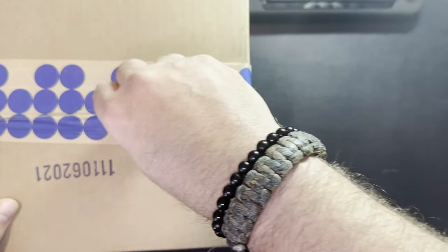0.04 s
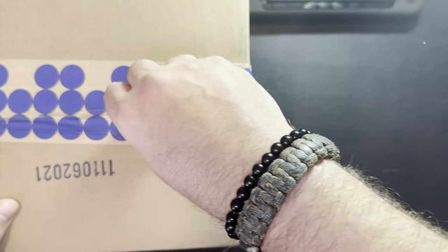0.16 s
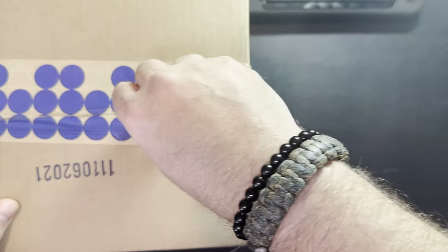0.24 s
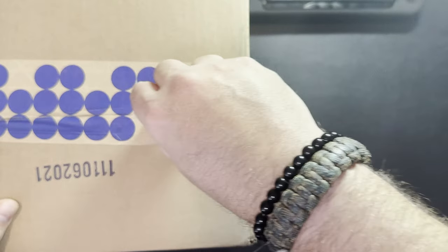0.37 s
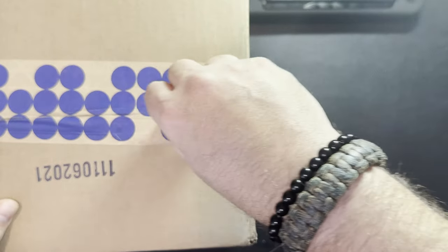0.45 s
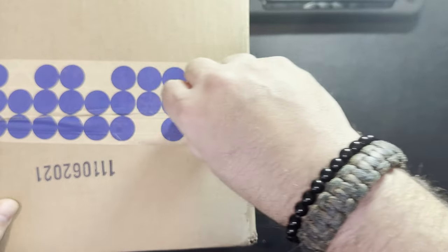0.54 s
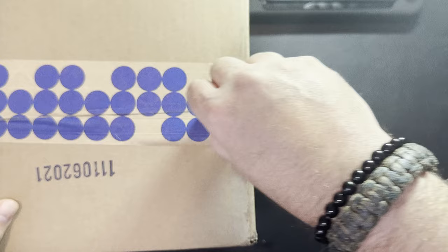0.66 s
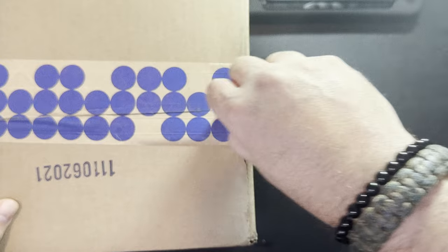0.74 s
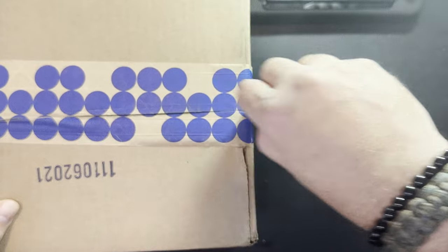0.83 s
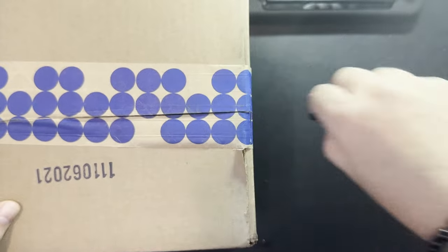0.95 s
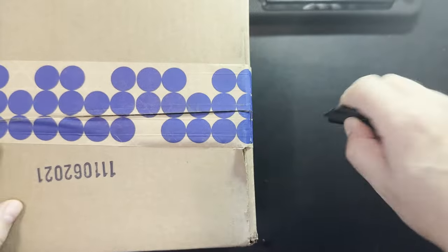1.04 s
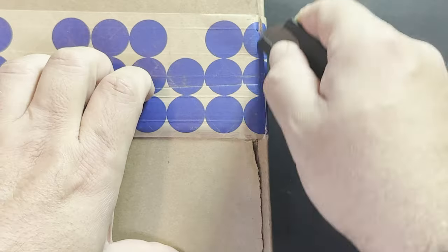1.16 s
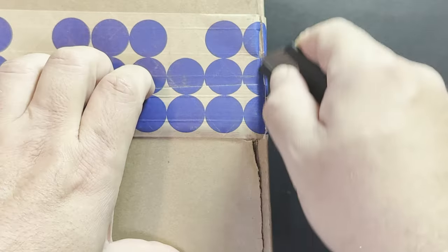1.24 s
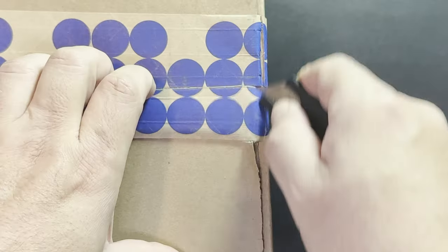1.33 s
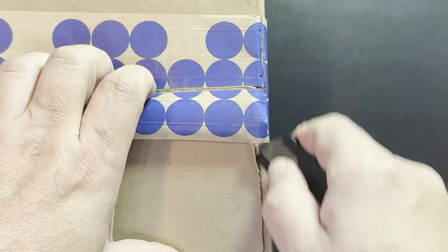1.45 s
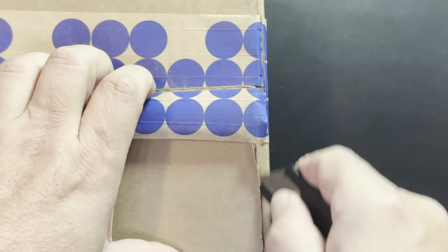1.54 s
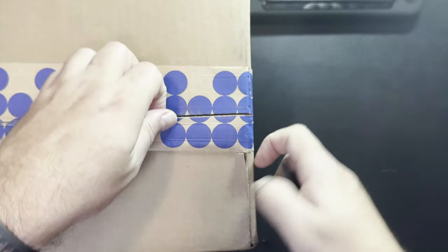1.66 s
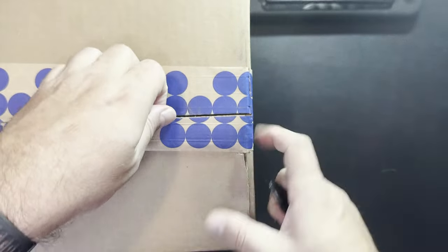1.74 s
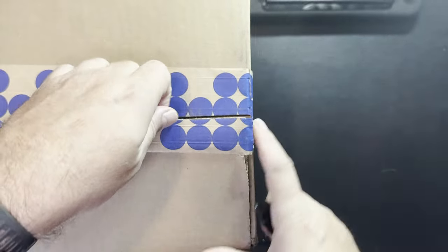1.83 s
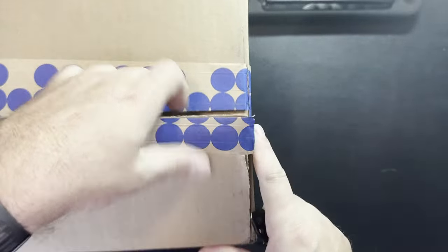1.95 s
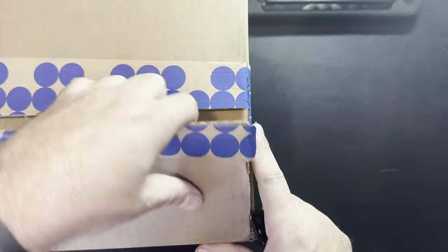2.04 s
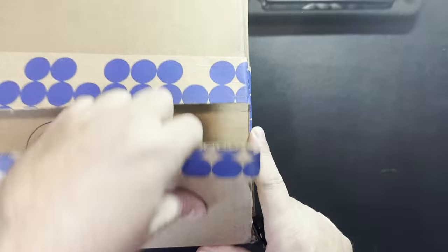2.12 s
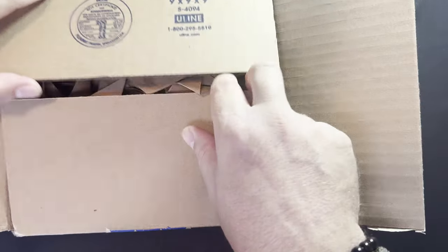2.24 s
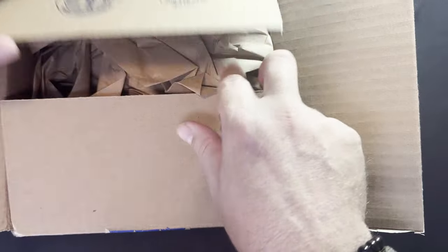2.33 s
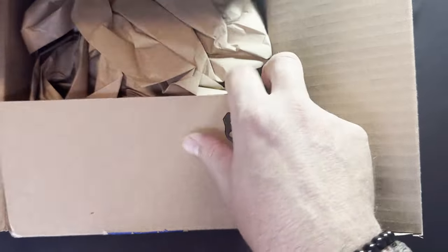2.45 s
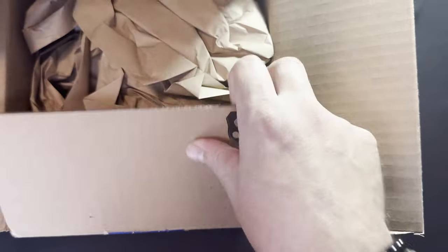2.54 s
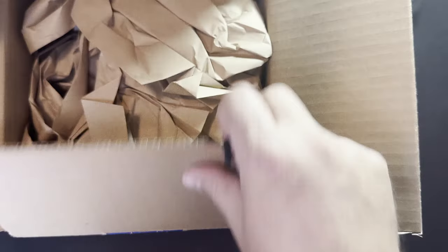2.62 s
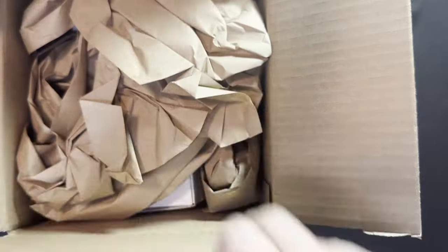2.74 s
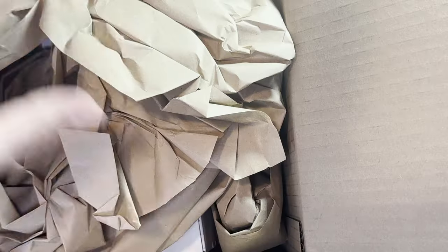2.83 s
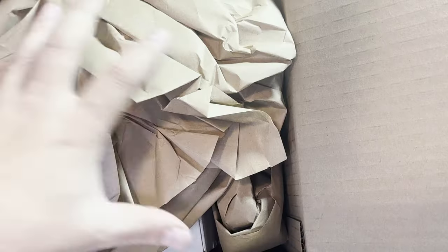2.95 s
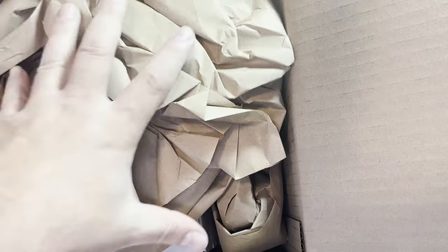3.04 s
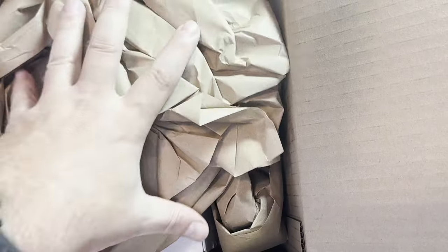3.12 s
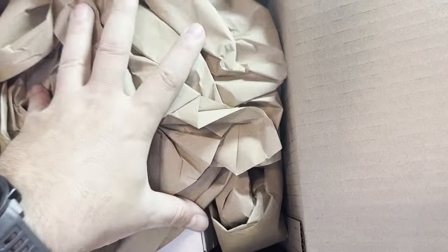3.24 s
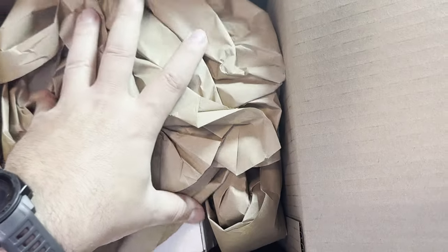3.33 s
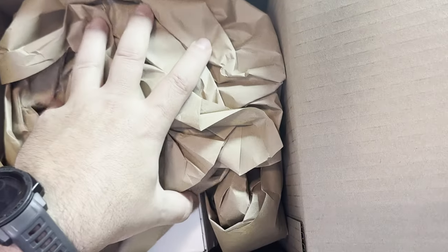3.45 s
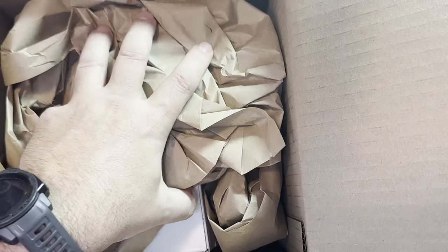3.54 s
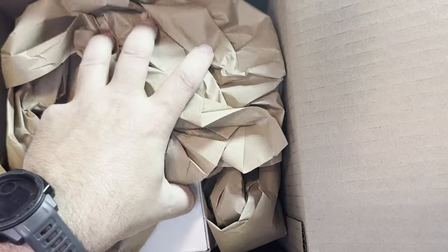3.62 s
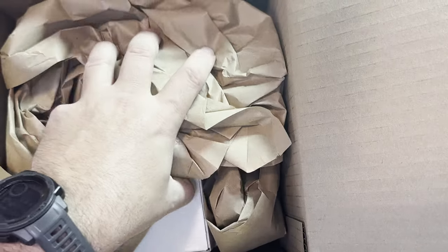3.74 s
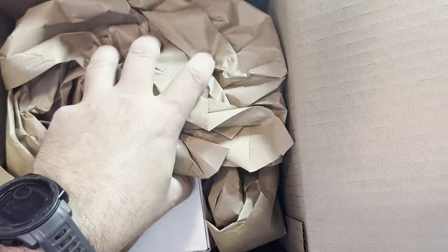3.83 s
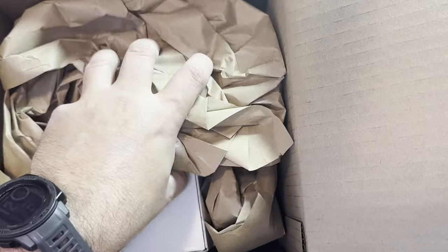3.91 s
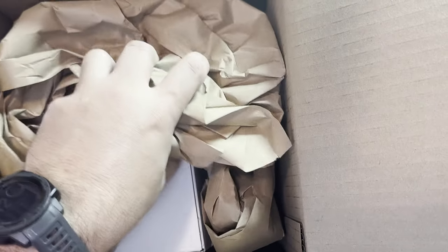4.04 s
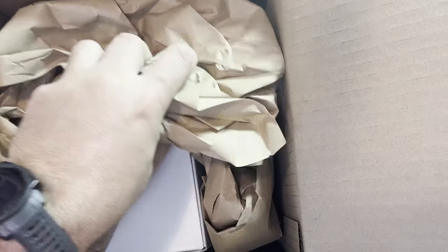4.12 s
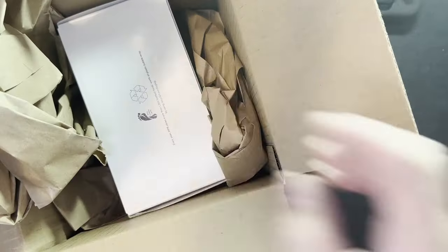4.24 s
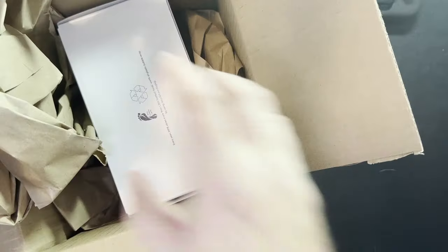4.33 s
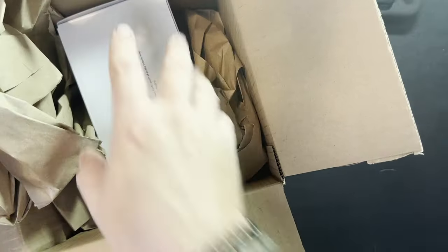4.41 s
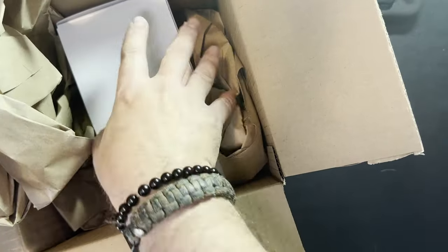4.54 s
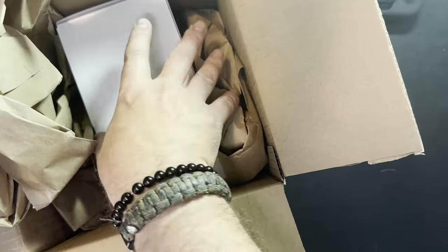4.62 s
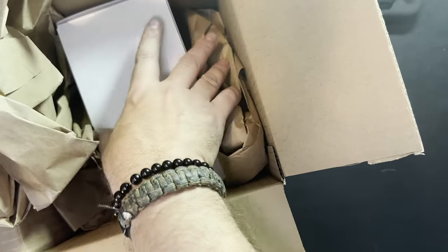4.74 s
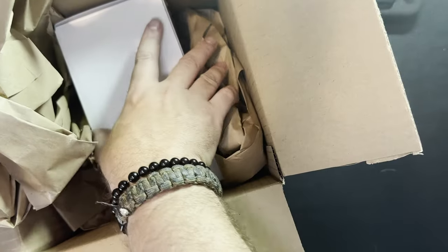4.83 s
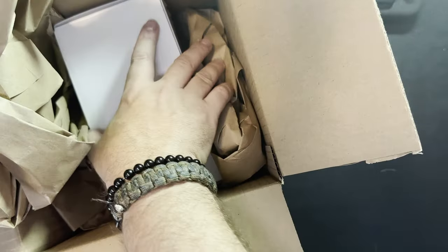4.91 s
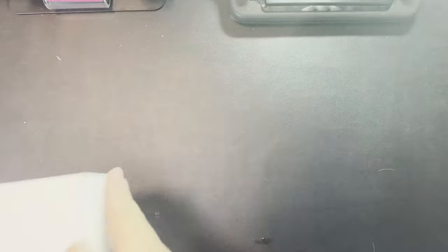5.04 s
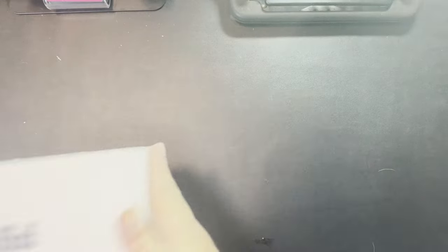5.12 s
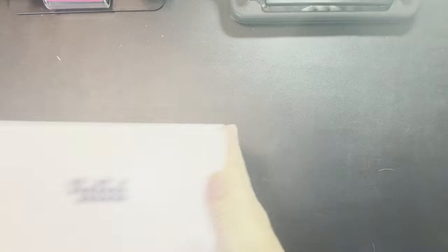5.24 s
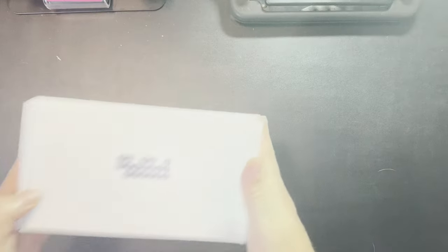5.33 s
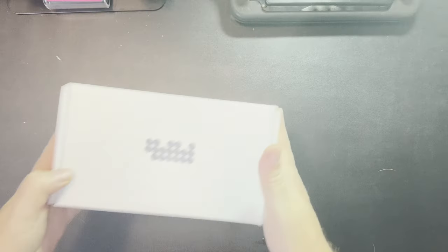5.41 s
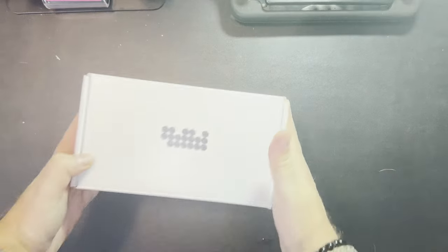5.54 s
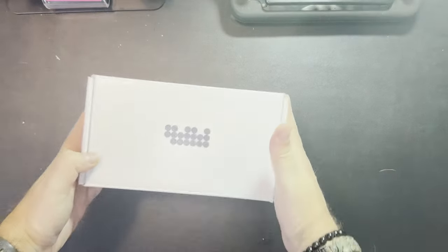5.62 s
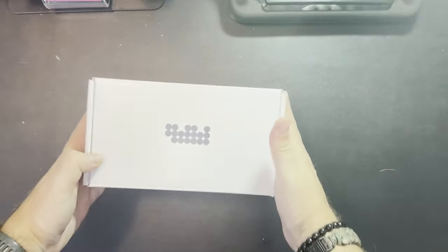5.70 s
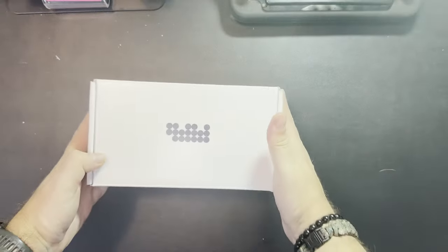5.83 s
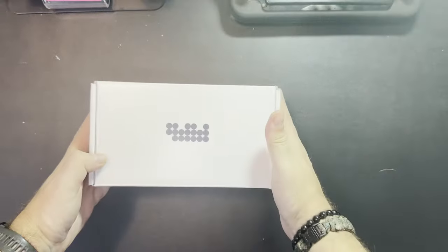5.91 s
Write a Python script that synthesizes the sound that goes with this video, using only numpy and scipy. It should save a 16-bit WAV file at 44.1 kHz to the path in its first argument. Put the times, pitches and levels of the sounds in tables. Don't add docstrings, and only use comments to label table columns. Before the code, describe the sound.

A blade slits box tape with a bright, rising zip, flaps pop and creak open, packing paper crackles loudly, then fingertips softly tap a small carton.

```python
import sys
import numpy as np
from scipy import signal
from scipy.fft import rfft, irfft, next_fast_len
from scipy.io import wavfile
from scipy.ndimage import uniform_filter1d, map_coordinates

SR = 44100
rng = np.random.default_rng(int(sys.argv[2]) if len(sys.argv) > 2 else 0)


def put_to_file(sound):
    columns = np.atleast_2d(sound).T
    safe = np.clip(columns, -1, 1)
    whole_steps = np.round(safe * 32767)
    wavfile.write(sys.argv[1], SR, whole_steps.astype(np.int16))


def convert_level_to_amplitude(level_db):
    exponent = np.asarray(level_db, float) / 20
    return 10 ** exponent


N = 263272
T = np.arange(N) / SR


def unit(x):
    return x / np.sqrt(np.mean(x ** 2) + 1e-20)


def along(points, hz):
    f, v = np.transpose(points)
    return np.interp(np.log(hz + 1), np.log(f + 1), v)


def filtered(x, response):
    m = next_fast_len(x.shape[-1] + 8192)
    spectrum = rfft(x, m) * response(np.fft.rfftfreq(m, 1 / SR))
    return irfft(spectrum, m)[..., :x.shape[-1]]


def colour(x, points):
    return filtered(x, lambda hz: convert_level_to_amplitude(along(points, hz)))


def ring(x, modes, factor=1):
    def response(f):
        total = 0
        for k, (centre, width, db) in enumerate(modes):
            resonance = 1j * f * width / ((factor * centre) ** 2 - f * f + 1j * f * width)
            total = total + (-1) ** k * convert_level_to_amplitude(db) * resonance
        return total
    return filtered(x, response)


def wobble(rate):
    return map_coordinates(rng.standard_normal(int(N * rate / SR) + 4), [T * rate])


# start in seconds, end in seconds.
SHOTS = [
    (0, 1.197),
    (1.197, 2.823),
    (2.823, 4.281),
    (4.281, 5.033),
    (5.033, 5.97),
]


def by_shot(values):
    return np.asarray(values)[np.searchsorted([end for _, end in SHOTS[:-1]], T)]


def even_shots(x):
    return x / by_shot([np.std(x[int(a * SR):int(b * SR)]) for a, b in SHOTS])


# time in seconds, rubbing effort in dB, weight on the box in dB over the effort.
SLIT = [(0.0, -55, -1.5), (0.106, -59.5, -0.5), (0.788, -49, -14), (0.868, -41, -2), (0.874, -52.5, 10.5),
        (0.888, -45, -12)]
AWAY = [(0.905, -53.5, 2.5), (1.005, -72, -6), (1.025, -72, -10), (1.04, -68, -8.5), (1.065, -78, -3),
        (1.095, -69.5, 0.5), (1.12, -83, 9), (1.191, -99, -9)]
SIDE_CUT = [(1.199, -53.5, -5), (1.3, -49, -6), (1.335, -52, -4.5), (1.368, -42, -12.5), (1.395, -40, 0.5),
            (1.431, -48.5, -2), (1.56, -47.5, -3), (1.664, -49.5, -11), (1.7, -69, 18)]
OPEN = [(1.71, -62.5, 5.1), (1.85, -65.5, 3.9), (1.865, -53.5, 3.4), (1.91, -63.5, 5), (1.945, -58.5, 3.2),
        (1.96, -46.5, 3), (2, -62.5, 7), (2.17, -57, 5.4), (2.33, -64, 4.4)]
SWING = [(2.34, -55, -1), (2.434, -66.5, 0.5), (2.48, -54, -4.5), (2.54, -67.5, 2), (2.796, -55, -3),
         (2.82, -59.5, 1.5)]
REACH = [(2.828, -94.5, 17.5), (2.928, -92, 2), (3.0, -58.5, -6.5), (3.08, -51.5, -9), (3.13, -39.5, -16.5),
         (3.17, -46, -5.5), (3.24, -37.5, -8.5), (3.35, -40.5, -10.5), (3.4, -38.5, -19)]
DIG = [(3.41, -42.5, 0), (3.47, -41, -4.5), (3.52, -40.5, 0.5), (3.6, -37.5, -8), (3.68, -37, -0.5),
       (3.7, -40, -7.5), (3.75, -38.5, 9), (3.8, -42, -5.5)]
STIR = [(3.805, -44, 0.5), (3.88, -41, -3), (3.95, -39.5, -3), (3.99, -39.5, -5), (4.08, -38, -1.5),
        (4.16, -36.5, -3), (4.22, -43.5, 0), (4.265, -48, 1), (4.278, -45, 1)]
REST = [(4.284, -76.5, -7.5), (4.407, -76.5, -3), (4.447, -76, 7)]
LIFT = [(4.454, -41, -41), (4.489, -42, -12), (4.505, -48, 3), (4.59, -51.5, -3), (4.72, -48.5, -1.5),
        (4.8, -45.5, -2.5), (4.87, -44, -4), (5.009, -45.5, -2), (5.028, -50.5, 0)]
CARRY = [(5.035, -75, 11.5), (5.213, -66.5, 10.5), (5.272, -86.5, 18), (5.281, -58, -13),
         (5.308, -87.5, 20.5)]
TILT = [(5.315, -56, -11), (5.328, -57, -14), (5.37, -62.5, 0), (5.42, -66, 9.5), (5.58, -70, 1.5),
        (5.602, -65, 13.5), (5.676, -66.5, 16), (5.706, -75.5, 13.5), (5.785, -84, 4)]
HOLD = [(5.79, -89, -10.5), (5.792, -65.5, -30), (5.869, -74.5, -17), (5.926, -96, 9), (5.943, -55.5, 4.5),
        (5.969, -61, 10.5)]
MOVES = [SLIT, AWAY, SIDE_CUT, OPEN, SWING, REACH, DIG, STIR, REST, LIFT, CARRY, TILT, HOLD]
# desk rumble in dB, hollow box in dB, crackle in dB, fizz in dB,
# extra fizz in dB per dB of effort.
MIX = [(-56, 3, -4.5, -4.5, 0.54), (-66.5, 4.5, -4, -6.5, 0.46), (-59.5, 1, -8, -6.5, 0.4),
       (-60, -0.5, -2, -2, -0.092), (-63.5, 1.5, -3, -3, 0.17), (-63, 2.5, -2.5, -5, -0.43),
       (-57.5, -3.5, 0.5, -8, 0.75), (-51.5, -2.5, 3.5, -4.5, -0.046), (-78, 0, -3, -17, -0.64),
       (-60.5, -3, -1.5, -9, -0.13), (-64.5, -1.5, -3, -16, 1), (-78, -4, -10, -10, 0.68),
       (-77, 0.5, -6.5, -16, -0.35)]
DESK_FOLLOWS = 0.65


def efforts():
    rows = []
    for move, (desk_db, box_db, crackle_db, fizz_db, growth) in zip(MOVES, MIX):
        s, effort, weight = np.transpose(move)
        load = effort + weight
        desk = desk_db + DESK_FOLLOWS * (load - load.mean())
        fizz = fizz_db + effort + growth * (effort - effort.mean())
        rows.append([s, desk, box_db + load, crackle_db + effort, fizz])
    s, *levels = np.hstack(rows)
    return [convert_level_to_amplitude(np.interp(T, np.maximum.accumulate(s), c)) for c in levels]


# share of separate creases from 0 to 1, scatter of their size in dB.
GRAIN = [(.12, 3), (.16, 2.6), (.5, 3), (.45, 3), (.35, 3)]


def creases(draw, clumps, hz, spread, cycles):
    share, scatter_db = (by_shot(c) for c in np.transpose(GRAIN))
    at = (draw[:, 0] * (N - 1)).astype(int)
    pitch = np.clip(hz * np.exp(spread * rng.standard_normal(len(draw))), 100, 16000)[:, None]
    size_db = -scatter_db[at] * np.log(draw[:, 1] + 0.03) + clumps[at]
    n = np.arange(192)
    turn = pitch * n / SR
    wave = convert_level_to_amplitude(size_db)[:, None] * np.sqrt(pitch) * np.sin(2 * np.pi * turn) * np.exp(-turn / cycles)
    grains = np.bincount((at[:, None] + n).ravel(), wave.ravel(), N + len(n))[:N]
    hiss = convert_level_to_amplitude(1.1 * wobble(30) + 0.4 * clumps) * rng.standard_normal(N)
    share = np.clip(share, 0, 1)
    return np.sqrt(share) * even_shots(grains) + np.sqrt(1 - share) * hiss


# time in seconds, resonance factor.
CLIMB = [
    (.2, 1.093),
    (.6, 1.122),
    (.88, 1.212),
]


def blade(x, modes, climb):
    s, factor = np.transpose(CLIMB)
    place = np.interp(T, s, np.arange(len(s)))
    out = 0
    for k, f in enumerate(factor):
        fade = np.clip(1 - abs(place - k), 0, 1) ** 0.5
        out = out + fade * ring(x, modes, f ** climb)
    return out


def patchy(x, depth_db):
    z = signal.stft(x, nperseg=512)[2]
    field = uniform_filter1d(rng.standard_normal(z.shape), size=7, axis=0)
    field = uniform_filter1d(field, size=8, axis=1)
    return signal.istft(z * convert_level_to_amplitude(depth_db * unit(field)), nperseg=512)[1][:N]


# pitch in Hz, width in Hz, level in dB.
RASP = [(1620, 200, 6.5), (2550, 350, 7.5), (1130, 1600, 4)]
# pitch in Hz, width in Hz, level in dB.
BLADE = [(3260, 3850, -5.5), (4640, 1100, -1), (6130, 970, -6.5), (8230, 710, -5), (9760, 510, -0.5),
         (13300, 410, -0.5), (15400, 4300, -22)]
# pitch in Hz, width in Hz, level in dB.
BOX = [(215, 26, -0.5), (333, 65, -1.5), (504, 50, -3.5), (636.4, 71, -4), (850, 1000, -17),
       (1450, 200, -13.5)]
# frequency in Hz, level in dB.
RUMBLE = [(25, -34), (45, -4.5), (65, -3.5), (110, -8.5), (170, -9.5), (300, -36.5)]
# frequency in Hz, level in dB.
CRACKLE = [(400, -15), (800, -4), (1200, -3.5), (2000, -3.5), (2700, -3.5), (3400, -9.5), (5000, -13.5),
           (8000, -46.5)]
# frequency in Hz, level in dB.
FIZZ = [(1800, -20.5), (3000, -2), (4800, -1.5), (6500, 3.5), (9000, 2.5), (12000, 2), (15500, -1),
        (17000, -2.5)]
# frequency in Hz, level in dB.
SKIN = [(1200, -38), (2300, 9), (3500, -2), (6000, -2), (9000, -9), (15500, -17)]
# frequency in Hz, level in dB.
LID = [(4300, -3.5), (4950, -11), (5600, -1.5)]


def rustle():
    desk, hollow, crackle, fizz = efforts()
    flips, clumps = rng.random((10000, 2)), 2.7 * wobble(90)
    coarse = creases(flips, clumps, hz=1400, spread=0.65, cycles=1.4)
    fine = creases(flips, clumps, hz=8240, spread=0.57, cycles=1.9)

    cutting = T < SHOTS[0][1]
    rasp = unit(blade(ring(coarse, RASP), RASP, climb=0.2))
    coarse = np.where(cutting, rasp, patchy(coarse, depth_db=2.5))
    fine = np.where(cutting, unit(blade(fine, BLADE, climb=1)), patchy(fine, depth_db=2.2))
    fine = np.where(T > SHOTS[-1][0], colour(fine, SKIN), colour(fine, FIZZ))
    fine = np.where(T < SHOTS[1][1], colour(fine, LID), fine)

    drum = ring(creases(rng.random((3000, 2)), clumps, hz=384.0, spread=0.6, cycles=0.91), BOX)
    drum = colour(drum, [(110, -6.0), (170, -10.5), (800, -4.5), (1100, -1)])
    low = convert_level_to_amplitude(2.2 * wobble(20)) * colour(rng.standard_normal(N), RUMBLE)
    body = desk * unit(low) + hollow * even_shots(drum)
    return body + crackle * even_shots(colour(coarse, CRACKLE)) + convert_level_to_amplitude(4) * fizz * even_shots(fine)


# time in seconds, hum level in dB.
DRAG = [
    (0, -56),
    (.3, -58.5),
    (.5, -57),
    (.65, -82),
]
# pitch in Hz, width in Hz, level in dB.
DRAG_HUM = [(322, 55, -2), (562, 29, -8)]


def drag():
    s, db = np.transpose(DRAG)
    hum = ring(ring(rng.standard_normal(N), DRAG_HUM), DRAG_HUM)
    return convert_level_to_amplitude(np.interp(T, s, db, right=-150)) * unit(hum)


def bursts(times, levels_db, lengths, pitches=None, blur=0, rise=0.00075):
    out, t = np.zeros(N + SR), np.arange(SR // 10) / SR
    for k, (s, db, length) in enumerate(zip(times, levels_db, lengths)):
        shape = convert_level_to_amplitude(-60 * t / (3 * max(length, 0.001))) * (1 - np.exp(-t / rise)) ** 2
        wave = rng.standard_normal(len(t))
        if pitches is not None:
            wave = np.sin(2 * np.pi * pitches[k] * t + blur * np.cumsum(wave))
        out[round(s * SR):][:len(t)] += convert_level_to_amplitude(db) * shape * wave
    return out[:N]


# start in seconds, peak in dB, box knock in dB, knock pitch in Hz, treble in dB.
POPS = [(0.891, -13, -13, 316, -18), (1.275, -36.5, -3, 202, -21), (1.369, -32, -8, 530, 1.5),
        (1.39, -32, -3.5, 285, 7.5), (1.5221, -22, -15.5, 550, -8.5), (1.7365, -13.5, -6, 600, -25),
        (1.738, -39, 16, 276, -23), (1.834, -46.5, -5, 218, -15.5), (1.953, -17.5, 6, 320, -19),
        (2.024, -42, 7, 316, -18), (2.287, -47, 12, 285, -26), (2.268, -28.5, 0, 675, -8)]
# start in seconds, peak in dB, box knock in dB, knock pitch in Hz,
# treble in dB.
CREAKS = [(1.035, -52, -4.5, 241, -13), (1.088, -52, -3.5, 596, -19), (1.3445, -34.5, 0.5, 260, -5),
          (1.655, -40, -26.5, 660, -44), (1.859, -39, 6, 504, -14), (1.946, -37, -3.5, 485, -9),
          (2.098, -45, -2, 221, -36), (2.136, -36, -37, 360, -37), (2.163, -36.5, 0.5, 360, -11.5),
          (2.24, -45.5, 6.5, 645, -32), (2.28, -33, 8.5, 551, -8.5), (2.295, -44.5, 15, 535, -5),
          (2.301, -43.5, -4.5, 504, 1.5)]
POP_S, CREAK_S = 0.0033, 0.0073


def pops():
    s, db, knock_db, hz, treble_db = np.transpose(POPS + CREAKS)
    length = np.repeat([POP_S, CREAK_S], [len(POPS), len(CREAKS)])
    crack = bursts(s, db + 9.5, 0.71 * length, 1600 + 0 * s, blur=0.6, rise=0.00067)
    treble = bursts(s, db + treble_db + 14.0, length, rise=0.0013)
    flap = bursts(s + 0.00092, db + knock_db + 1.5, 2.74 * length + 0.0044, hz, blur=0.022)
    box = ring(bursts(s + 0.001, db + knock_db + 24, 0.6 * length), BOX)
    box = colour(box, [(800, 6.5), (1600, 8.5), (2500, -24.0)])
    return colour(crack, CRACKLE) + colour(treble, FIZZ) + flap + box


# frequency in Hz, level in dB.
FOLD = [(250, -44.5), (500, 12.5), (1000, 22.5), (1500, -36), (2500, -34.5)]
SNAP_CYCLES = 6.74


def snaps(rows, rise):
    s, db, hz, fold_db, treble_db = np.transpose(rows)
    length = SNAP_CYCLES / np.sqrt(hz * 2600)
    crack = bursts(s, db + 5, length, hz, blur=0.17, rise=rise)
    crack = crack + bursts(s, db + 3, 0.7 * length, 1.7 * hz, blur=0.2, rise=rise)
    treble = colour(bursts(s, db + treble_db + 15.0, 0.7 * length, rise=rise), FIZZ)
    return crack + treble + colour(bursts(s, db + fold_db + 8.0, 0.55 * length), FOLD)


# start in seconds, peak in dB, pitch in Hz, fold in dB, treble in dB.
DIG_SNAPS = [(2.9804, -42.5, 2100, -15, -19), (3.027, -32.5, 900, -9.5, -16), (3.1156, -33.5, 1200, -5, 0),
             (3.1809, -24, 2220, -8, -30), (3.2041, -26.5, 1180, -15, -22),
             (3.2865, -22.5, 2490, -14.5, -9), (3.37, -56.5, 1200, -25, 26.5),
             (3.394, -22, 1370, -10.5, -1.5), (3.436, -17.5, 2080, -6, -4), (3.4997, -22, 1850, -5, -30.5),
             (3.6458, -34, 1850, -5, -2.5), (3.6736, -24.5, 1636, -1, 2.5), (3.7433, -17, 1130, -20, -15),
             (3.8124, -45, 1550, -14, -3), (3.8349, -25.5, 1130, -5, -3.5), (3.918, -30, 1240, -19, 3),
             (4.0376, -21, 2030, -20, -22), (4.0744, -42.5, 1130, -16, 1), (4.132, -20.5, 2040, -9.5, -2.5),
             (4.2046, -22, 1510, -8, -13)]
# start in seconds, peak in dB, pitch in Hz, fold in dB, treble in dB.
LIFT_SNAPS = [(4.3063, -48, 1700, -24, -36), (4.4593, -27, 1450, -38, -11), (4.484, -27.5, 1740, -1.5, 4.5),
              (4.5327, -31, 1310, -15, -18), (4.6075, -27, 2460, 0, -6.5), (4.6815, -27.5, 1330, -40, -9),
              (4.738, -43.5, 2230, -6, 15), (4.755, -31.5, 2380, -15, 5.5),
              (4.801, -32.5, 1620, -16.5, -3.5), (4.835, -12.5, 2650, -28, -9.5),
              (4.8771, -32, 1160, -3.5, -18), (4.938, -21, 2120, -10, -6), (4.963, -18, 1353, -30.5, -4),
              (4.992, -25, 2250, -24.5, -17), (5.002, -17.5, 2310, -34, -10.5)]


def paper_snaps():
    return snaps(DIG_SNAPS + LIFT_SNAPS, rise=0.001)


TEAR_S = [1.388, 1.5225, 1.7368, 1.8335, 1.8592, 1.861, 1.9505, 1.958]
# peak in dB, pitch in Hz, fold in dB, treble in dB.
TEARS = [(-31, 6000, -29, -12), (-41, 3500, -21, -19), (-13.5, 6500, -31, -4), (-37, 1500, -22.5, -23),
         (-19.5, 2300, -28.5, -2.5), (-25.5, 1400, -27.5, -9.5), (-37, 2250, -21.5, 2),
         (-35.5, 2800, -26, 4)]


def tears():
    return snaps([(s, *row) for s, row in zip(TEAR_S, TEARS)], rise=0.001)


# start in seconds, peak in dB, pitch in Hz, fold in dB, treble in dB.
CRUMPS = [(3.067, -52, 694, -13.5, -2), (3.092, -37.5, 815, -5, -7), (3.147, -31, 1410, -5, -23),
          (3.181, -25.5, 840, -8.5, -33), (3.224, -26.5, 1050, -7.5, -10), (3.268, -33.5, 945, 5, -3),
          (3.451, -27.5, 2400, -15, -20), (3.486, -21.5, 900, -15.5, -11.5), (3.609, -26, 1114, -12, -22),
          (3.628, -24, 1133, -10, -22), (3.665, -17.5, 1036, -15.5, -13), (3.721, -27.5, 1350, -14, -17.5),
          (3.751, -25, 727, -28, -9), (3.876, -28, 1640, -14, -21), (3.923, -26, 929, -6.5, -22),
          (3.954, -31, 960, -16.5, -25), (4.016, -24.5, 1890, -19, -18), (4.082, -22, 900, -14, -3.5),
          (4.153, -30.5, 1132, -6, -13), (4.485, -32, 706, -9, -9), (4.557, -29, 1006, -15, -22),
          (4.635, -40, 2400, -10, -18), (4.784, -31, 1122, -23, -27.5), (4.903, -34.5, 870, -8, -19)]


def crumps():
    return snaps(CRUMPS, rise=0.0013)


# start in seconds, peak in dB, pitch in Hz.
CRINKLES = [(3.322, -27.5, 790), (3.463, -26.5, 990), (3.566, -30.5, 900), (3.589, -31, 1240),
            (3.6, -35, 1260), (3.611, -27.5, 2600), (3.808, -44, 830), (3.935, -22, 996), (4.058, -30, 800),
            (4.096, -23, 1090), (4.188, -22.5, 896), (4.225, -30, 1600), (4.342, -60, 1300),
            (4.366, -53.5, 1200), (4.8349, -14.5, 3960), (4.608, -31, 640), (2.959, -55, 800),
            (2.96, -57, 2200), (2.997, -52, 2270), (5.296, -60, 1300)]


def crinkles():
    fold_db, treble_db = -19, -22
    return snaps([(*row, fold_db, treble_db) for row in CRINKLES], rise=0.0012)


# start in seconds, peak in dB.
TICKS = [(3.22, -24), (3.311, -25), (3.321, -27), (3.464, -27), (3.532, -34.5), (3.554, -26.5),
         (3.6, -27.5), (3.645, -29), (3.664, -28), (3.713, -30), (3.813, -29), (3.898, -25), (3.917, -26.5),
         (3.982, -22.5), (4.0038, -21), (4.019, -22.5), (4.0662, -28), (4.157, -23), (4.171, -20),
         (4.811, -28), (4.827, -32), (4.902, -33.5), (4.9132, -29), (5.008, -25.5)]


def ticks():
    s, db = np.transpose(TICKS)
    return colour(bursts(s, db + 10.5, 0 * s + 0.0014, rise=0.00041), FIZZ)


# start in seconds, peak in dB, pitch drop in Hz, last pitch in Hz,
# fall time in seconds.
RIP = (1.388, -29, 6500, 500, 0.0055)


def rip():
    s, db, drop_hz, last_hz, fall = RIP
    t = np.clip(T - s, 0, None)
    turns = np.cumsum(last_hz + drop_hz * np.exp(-t / fall)) / SR
    rough = np.sin(2 * np.pi * turns + 0.3 * np.cumsum(rng.standard_normal(N)))
    return convert_level_to_amplitude(db - 60 * (t / 0.045) ** 2) * (1 - np.exp(-t / 0.0008)) * rough


# start in
# seconds, length in seconds, peak in dB, pitch in Hz.
JUDDERS = [(1.249, 0.064, -54, 3430), (1.262, 0.021, -53, 1560), (1.285, 0.027, -48, 1533),
           (1.345, 0.0081, -44.5, 1497), (1.641, 0.0038, -49, 3600), (1.659, 0.013, -50, 2590),
           (1.735, 0.0075, -42.5, 294), (1.776, 0.011, -45.5, 308), (1.963, 0.015, -29, 564),
           (2.096, 0.01, -53.5, 1390), (2.11, 0.0086, -50, 1450), (1.757, 0.01, -47, 616),
           (2.243, 0.0059, -49, 1480), (2.247, 0.0085, -53, 1460), (2.268, .005, -36, 1480),
           (2.281, 0.0033, -28, 1456), (2.284, 0.012, -33, 270), (2.296, .022, -27.5, 530),
           (2.298, 0.011, -37, 1476), (2.299, 0.011, -34, 248), (2.306, 0.011, -38, 688),
           (5.316, 0.032, -63, 2400)]
JUDDER_EDGE_S, JUDDER_BLUR = 0.002, 0.11


def judders():
    out = np.zeros(N)
    t = np.arange(SR // 20) / SR
    for s, length, db, hz in JUDDERS:
        shape = np.clip(np.minimum(t, length + JUDDER_EDGE_S - t) / JUDDER_EDGE_S, 0, 1)
        drift = JUDDER_BLUR * (hz / 1000) ** 0.75 * np.cumsum(rng.standard_normal(len(t)))
        out[round(s * SR):][:len(t)] += convert_level_to_amplitude(db) * shape * np.sin(2 * np.pi * hz * t + drift)
    return out


# start in seconds, peak in dB, pitch in Hz, tick in dB,
# length in seconds.
TAPS = [(5.15, -48, 326, -2, 0.026), (5.27, -67, 342, -4, 0.01), (5.301, -43.5, 211, -8.5, 0.025),
        (5.351, -57, 215, -9, 0.024), (5.399, -36.5, 216, -8, 0.015), (5.436, -43, 211, -12, 0.017),
        (5.472, -51.5, 314, 0, 0.021), (5.607, -40.5, 222, -4.5, 0.018), (5.633, -50, 302, -2, 0.015),
        (5.651, -48, 328, -18, 0.016), (5.659, -38.5, 215, -13, 0.016), (5.95, -39, 207, -25, 0.023)]
# frequency in Hz, level in dB.
KNUCKLE = [(500, -30), (900, -0.5), (1600, 0), (2500, -9.5), (3500, -22), (8000, -21)]


def taps():
    s, db, hz, tick_db, length = np.transpose(TAPS)
    soft = bursts(s, db + 15.5, length, hz, blur=0.028, rise=0.0063)
    soft = colour(soft, [(400, -4.0), (800, 5.0)])
    return soft + colour(bursts(s - 0.002, db + tick_db + 20.5, 0 * s + 0.0032), KNUCKLE)


def pushes(rows, first_hz):
    out, t = np.zeros(N + SR), np.arange(SR // 5) / SR
    for s, db, hz in rows:
        turns = np.cumsum(hz + first_hz * np.exp(-t / 0.00323)) / SR
        shape = convert_level_to_amplitude(db + 4.5 + 3.9 * np.exp(-t / 0.012) - 60 * t / 0.1) * (1 - np.exp(-t / 0.005))
        out[round(s * SR):][:len(t)] += shape * np.sin(2 * np.pi * turns)
    return out[:N]


# start in seconds, peak in dB, last pitch in Hz.
THUDS = [(0.866, -41, 143), (0.877, -38, 115.5), (0.893, -32.5, 99), (1.523, -37, 125), (1.737, -44.5, 97),
         (1.859, -30, 111), (1.954, -28, 109), (2.284, -37, 62.6), (3.489, -35, 100.6), (3.743, -35.5, 102),
         (4.036, -33, 164)]


def thuds():
    return pushes(THUDS, first_hz=1213)


# start in seconds, peak in dB, last pitch in Hz.
BUMPS = [
    (1.867, -41, 71),
    (1.969, -29, 80.3),
    (2.425, -55.5, 61.3),
    (2.83, -61, 70),
    (2.885, -67.5, 69),
    (2.634, -46, 66.4),
    (3.328, -41, 75),
    (4.199, -38, 61),
]


def bumps():
    return pushes(BUMPS, first_hz=40)


# frequency in Hz, seconds to fall by 60 dB.
ROOM = [(150, 0.28), (800, 0.18), (2400, 0.12), (8000, 0.16)]


def echoes(x):
    out, step = np.zeros(N + SR), SR // 4
    for a, b in SHOTS:
        end = round(b * SR)
        for start in range(round(a * SR), end, step):
            hz, t, z = signal.stft(rng.standard_normal(SR // 4), SR, nperseg=256)
            decay = convert_level_to_amplitude(-60 * t / along(ROOM, hz)[:, None])
            tail = signal.istft(z * decay, SR, nperseg=256)[1]
            piece = x[start:min(start + step, end)]
            piece = signal.fftconvolve(piece, tail / np.linalg.norm(tail))[:end - start]
            out[start:start + len(piece)] += piece
    return out[:N]


# frequency in Hz, level in dB.
AIR = [(100, -8), (400, -26.5), (2200, 11), (5000, -4), (9000, -27), (16000, -23.5)]


def air():
    return convert_level_to_amplitude(-81.0) * unit(colour(rng.standard_normal(N), AIR))


# frequency in Hz, phase in radians.
PORTS = [(0, 0), (2670, 0), (3190, .5), (4500, .1), (5250, -.45), (8530, -1.9), (9900, -2.4), (11000, -3.1),
         (13500, -3.2), (13900, -4), (15700, -4.7)]


def ports(x, slant):
    return filtered(x, lambda hz: np.exp(0.5j * slant * np.outer([1, -1], along(PORTS, hz))))


# frequency in Hz, level in dB.
SCATTER = [(60, -31.5), (200, -34.5), (500, -11.5), (1300, -10.5), (3000, -4), (6000, -8.5), (9000, -13.5),
           (14000, -14.5)]


def scene():
    hits = pops() + paper_snaps() + tears() + crumps() + ticks()
    hits = hits + taps() + thuds() + bumps() + judders()
    spread = convert_level_to_amplitude(-13.5) * echoes(hits) + rustle() + air() + drag()
    hits = hits + crinkles() + rip()
    unlike = colour(echoes(hits + spread), SCATTER)
    return ports(hits, 0.85) + ports(spread, 1) + np.array([unlike, -np.roll(unlike, 11)])


def low_pass(x):
    return signal.sosfilt(signal.butter(12, 17140, fs=SR, output="sos"), x)


# frequency in Hz, level in dB.
MIC = [(20, -25), (55, 0), (15750, 0), (15900, -36), (16900, -38), (17100, -70)]


def record(dry):
    heard = colour(dry, MIC)
    return low_pass(heard)


dry = scene()
out = record(dry)
put_to_file(out)
```